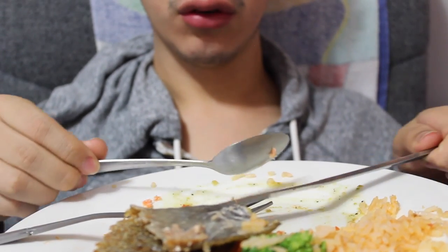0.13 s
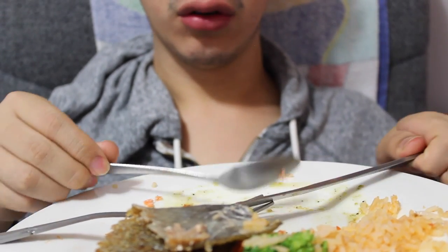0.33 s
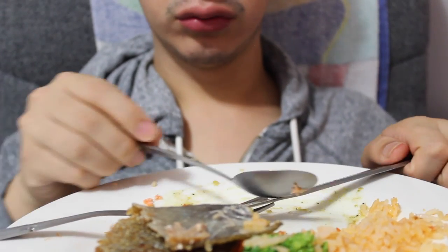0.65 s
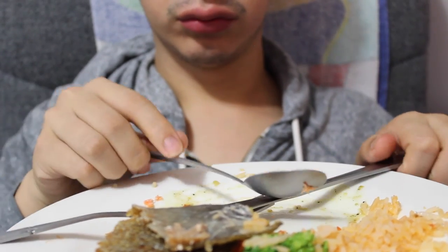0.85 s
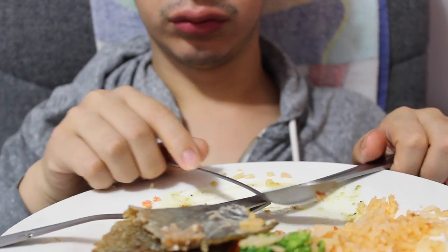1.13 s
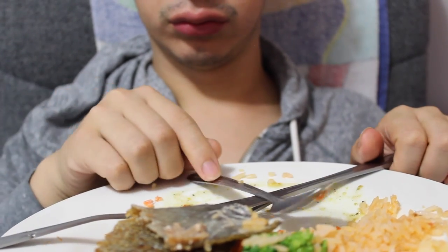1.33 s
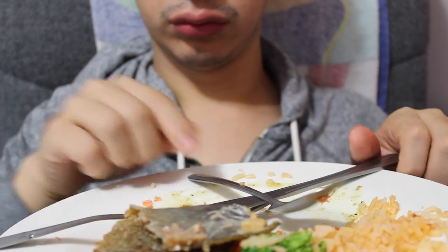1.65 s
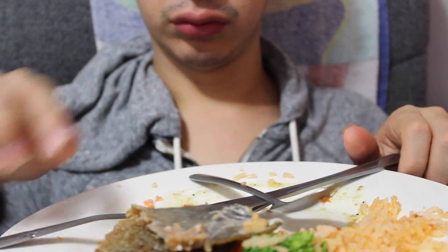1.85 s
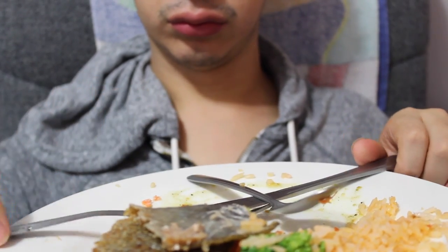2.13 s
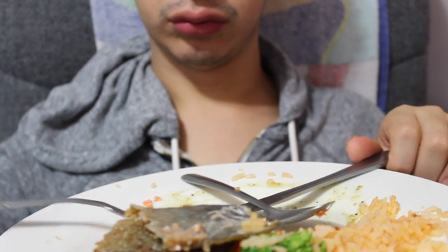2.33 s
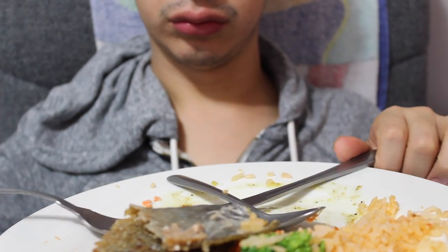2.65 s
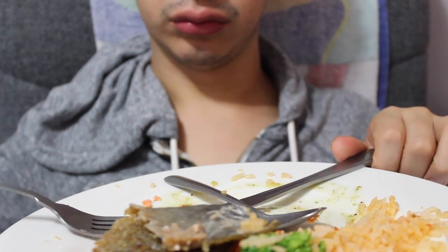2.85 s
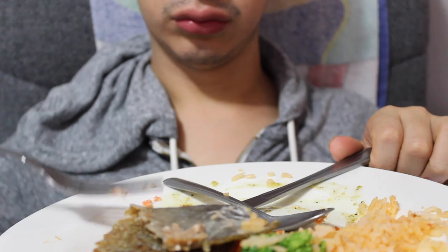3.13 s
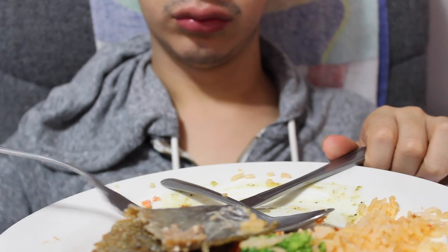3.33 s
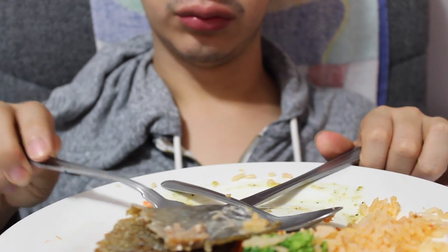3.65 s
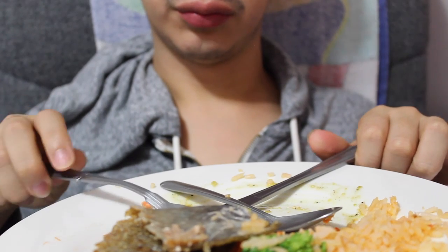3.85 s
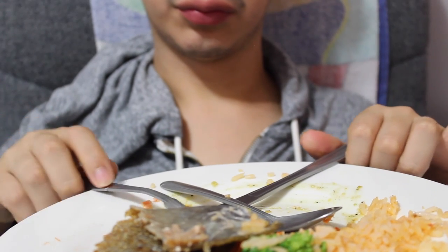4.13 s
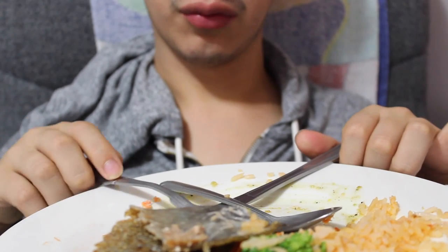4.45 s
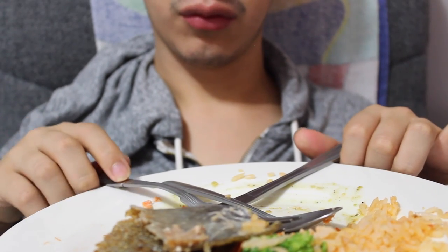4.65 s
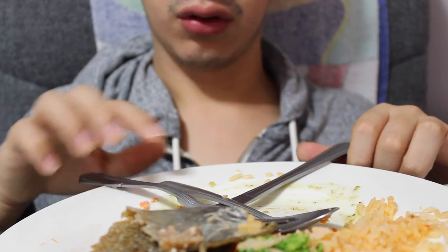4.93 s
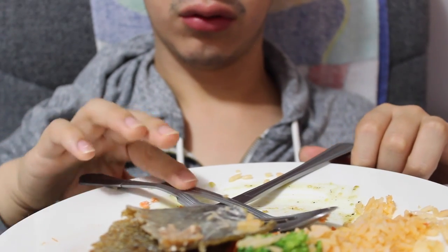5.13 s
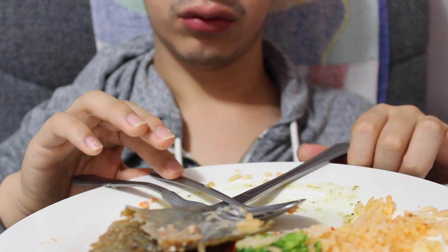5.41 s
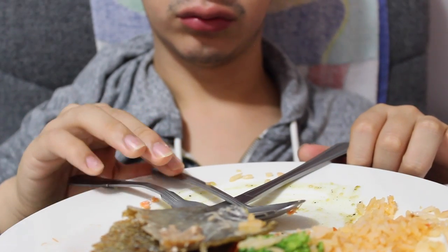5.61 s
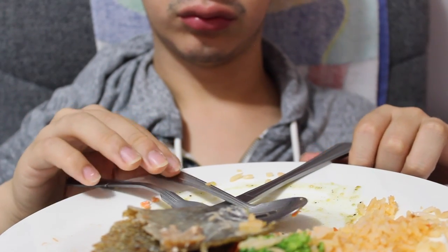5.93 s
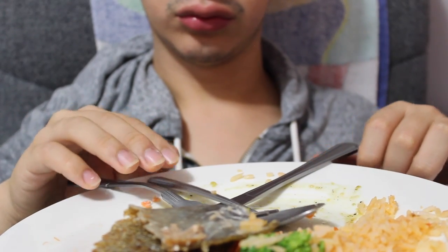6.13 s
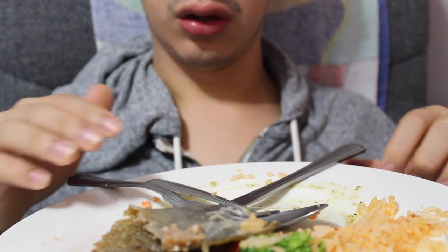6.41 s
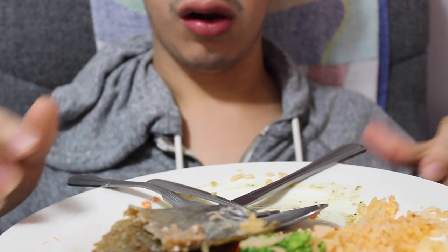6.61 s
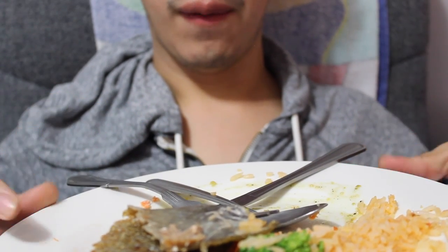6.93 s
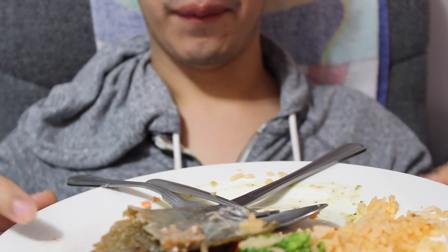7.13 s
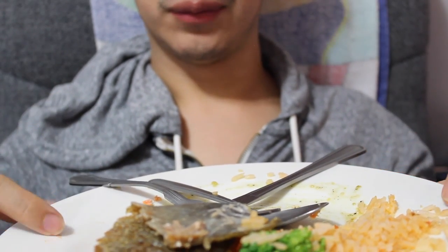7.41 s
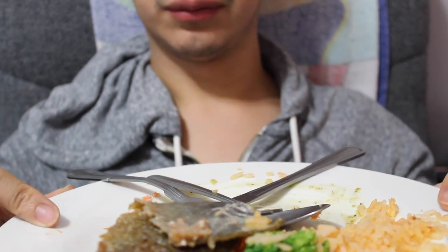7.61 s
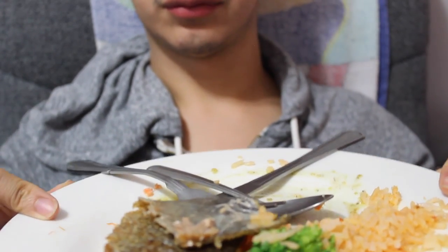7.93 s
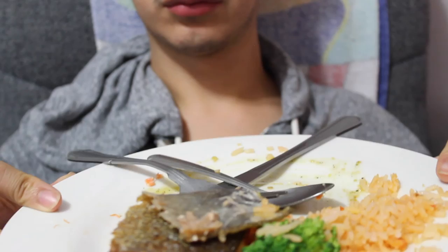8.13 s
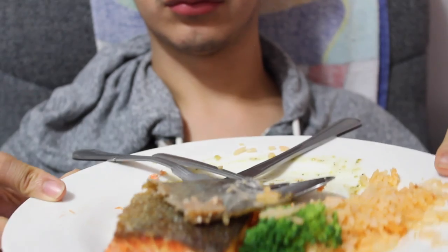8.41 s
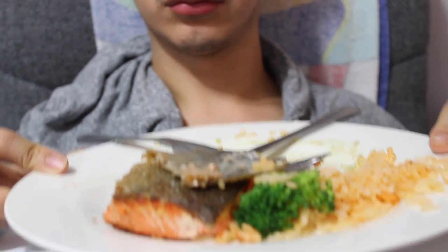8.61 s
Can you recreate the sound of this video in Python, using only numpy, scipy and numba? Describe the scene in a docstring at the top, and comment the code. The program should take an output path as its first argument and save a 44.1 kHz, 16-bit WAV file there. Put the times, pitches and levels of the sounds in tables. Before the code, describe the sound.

Metal spoon, knife and fork clink, rattle and scrape on a ceramic dinner plate close up, then soft hand bumps in a quiet room.

```python
"""Cutlery on a ceramic plate

Steel cutlery is laid, slid and dropped on a dinner plate close to a camera microphone. Each contact
is a short chatter of noisy impacts ringing damped modes of plate and steel; slides add gliding rings.
Fingers bump rim and table as softer bursts through low modes, over filtered-noise room tone and mains hum."""
import sys
import numpy as np
from scipy import signal
from scipy.fft import rfft, irfft, next_fast_len
from scipy.io import wavfile
from scipy.ndimage import uniform_filter1d
from numba import njit

SR = 44100
rng = np.random.default_rng(int(sys.argv[2]) if len(sys.argv) > 2 else 0)


def file_out(sig):
    """Save sig as 16-bit WAV at sys.argv[1]."""
    # one column per channel
    cols = np.atleast_2d(sig).T
    # limit, then scale
    lim = np.clip(cols, -1, 1)
    pcm = np.round(lim * 32767).astype(np.int16)
    wavfile.write(sys.argv[1], SR, pcm)


N = 386757

# Cutlery contacts: t/s, plate peak/dB, tines re plate/dB (capped at -4), bowl re plate/dB,
# nearest ring f/Hz, fall by 60 dB/s (capped at 0.3)
CONTACTS = [(.402, -19.5, -28, -39, 2016, 0.087), (.467, -28, -19, -20, 2460, .13),
            (.483, -14, -18.5, -22.5, 1804, .12), (0.587, -31, -39, -3.5, 2020, .085),
            (.649, -19.5, -12, -27, 3510, .15), (0.791, -45, -24, -33, 3920, 0.13),
            (0.839, -38.5, -24, -28, 3900, 0.054), (0.882, -42.5, -22, -26, 1870, 0.11),
            (.917, -41, -32, -5, 4680, 0.059), (0.968, -38.5, -24.5, -17, 1947, 0.18),
            (1.007, -38.5, -29, -36, 3796, .07), (1.045, -42.5, -33, -32, 1895, .1),
            (1.105, -49.5, -30.5, -32.5, 3480, 0.072), (1.165, -22, -43, -25, 2190, 0.34),
            (1.217, -13, -22.5, -20, 3160, 0.14), (1.249, -14, -19, -23.5, 3600, .14),
            (1.292, -13.5, -26, -27.5, 4780, 0.07), (1.356, -16, -11, -25.5, 5200, 0.29),
            (1.381, -12.5, -8.5, -32, 2810, 0.14), (1.407, -19, -5, -31, 2130, 0.039),
            (1.466, -16.5, -13, -34, 4770, .12), (1.508, -31.5, -27, -37, 2970, 0.09),
            (1.597, -33.5, -52, -33, 2720, 0.08), (2.099, -18.5, -23, -16.5, 1800, 0.12),
            (2.168, -28, -25, -30, 4520, 0.066), (2.276, -41.5, -20, -20, 4780, 0.092),
            (2.389, -15.5, -13, -26, 2800, 0.061), (2.402, -5.5, -16.5, -29.5, 1667, 0.12),
            (2.458, -16.5, -16, -32, 2130, 0.17), (2.509, -24.5, -36, -30, 2140, 0.27),
            (2.577, -24, -45, -19, 1650, 0.05), (2.602, -19.5, -19, -25, 4670, 0.17),
            (2.627, -22.5, -12, -11.5, 2100, 0.14), (2.672, -24, -19, -21, 2140, 0.12),
            (2.912, -37.5, -34, -54, 4790, 0.04), (3.009, -30, -21.5, -36, 2590, 0.067),
            (3.032, -19, -17, -41, 3430, 0.19), (3.068, -22.5, -11.5, -29, 1755, 0.11),
            (3.116, -16.5, -30, -23, 1740, 0.074), (3.194, -35.5, -30, -38, 4850, 0.039),
            (3.473, -18.5, -12, -26, 2780, 0.28), (3.524, -10, -12.5, -22, 4930, 0.084),
            (3.55, -13, -11.5, -23, 2650, 0.077), (3.568, -14, -13, -31, 3140, 0.11),
            (3.628, -28, -34, -21, 2850, 0.2), (3.706, -17.5, -12, -34, 2840, 0.093),
            (3.749, -27, -39, -25, 2870, .17), (4.047, -39.5, -36, -28, 3750, .1),
            (4.135, -32, -27.5, -27, 1703, 0.35), (4.223, -20, -10.5, -23, 4850, 0.11),
            (4.236, -20.5, -13.5, -23.5, 6120, .13), (4.321, -25.5, -43, -25.5, 2138, 0.069),
            (4.518, -48.5, -24, -30.5, 3820, 0.061), (4.596, -28.5, -36, -22, 3030, .14),
            (4.638, -30, -32, -28, 1695, 0.47), (4.693, -20, -17, -19.5, 1970, 0.058),
            (5.298, -31, -10, -32, 2890, 0.25), (5.323, -18, -19, -20, 2126, 0.39),
            (5.366, -19.5, -34, -49, 2060, .24), (5.415, -20.5, -12.5, -12, 1870, 0.067),
            (5.459, -26, -43, -20, 2450, .21), (5.512, -23.5, -26, -49, 2803, 0.12),
            (5.679, -41, -37, -44, 3465, 0.089), (5.686, -46, -37, -38, 4610, 0.03),
            (5.748, -31.5, -28, -29, 2606, 0.091), (5.893, -41, -38.5, -43, 3804, 0.04),
            (6.085, -16.5, -7.5, -23, 4370, 0.2), (6.109, -11, -14.5, -23, 4720, 0.2),
            (6.17, -24.5, -19, -29, 2780, 0.18), (6.211, -21, -11.5, -29, 2640, 0.21),
            (6.254, -21, -12, -27, 3030, 0.099), (6.291, -30, -23, -19, 2880, 0.18),
            (6.361, -32, -24, -12, 3170, 0.044), (7.225, -56, -24, -15, 3650, 0.096),
            (8.146, -52.5, -13.5, -10, 3550, 0.065), (8.134, -53, -11, -32, 5600, 0.034)]
# Steel dragged over glaze, per stroke: gliding ring width/Hz, plate re ring/dB, [(t/s, ring level/dB, f/Hz)]
SLIDES = [(251, -2.5, [(.71, -50, 1900), (.74, -49.5, 1950), (.79, -55.5, 2150), (.846, -51, 2480),
          (.89, -53, 2550), (.96, -61, 2720)]), (200, -8, [(2.22, -61, 2600), (2.27, -55, 2650),
          (2.305, -46, 2700), (2.39, -56.5, 2750)]), (297, 3, [(4.06, -61, 2780), (4.07, -47, 2760),
          (4.126, -43, 2560), (4.176, -45, 2570), (4.225, -50, 2470)])]
# Fingers and wrists on rim and table: t/s, peak/dB, skin tap re peak/dB (capped at 0),
# favoured ring f/Hz, fall by 60 dB/s (capped at 0.3)
KNOCKS = [(.873, -34, -20, 400, .068), (1.98, -42.5, -35, 316, 0.25), (2.04, -32, -39, 420, 0.35),
          (2.13, -39, -26, 388, 0.21), (2.188, -37, 3, 364, .077), (2.273, -41, -22, 237, 0.027),
          (6.299, -35.5, -20, 524, 0.029), (6.515, -47, -5.5, 600, 0.029), (6.859, -41, -24, 1006, 0.051),
          (6.874, -33.5, -27, 397, .083), (7.04, -36, -18, 890, 0.11), (7.065, -38.5, -15.5, 349, 0.052),
          (7.18, -34.5, -16.5, 880, 0.12), (7.197, -39, -7, 890, 0.13), (7.624, -33.5, -27, 322, 0.054),
          (8.141, -36, -14, 668, 0.093), (8.2, -51, -21, 398, 0.43), (8.625, -48, -21.5, 1010, .053)]

# Modes: f/Hz, width/Hz, relative level/dB before the scatter of each contact
# Low bending modes of the plate
BOWL_MODES = [(520, 10.8, -22.5), (572.4, 36.8, -10.5), (676.4, 26, 8), (790, 24, -5.5), (1015, 90, -11)]
# Plate and handles
PLATE_MODES = [(1460, 9, -16), (1460, 8.3, -23), (1758, 59, -8), (1768, 12, -5), (1723, 16, -7),
               (1902, 24, -2), (2148, 9.9, 3), (2293, 17, -22), (2635, 51, -14), (2637, 41, -0.5),
               (2870, 21, -10.5), (2968, 46, -0.5), (3089, 47, -5), (3410, 77, -14.5), (3517, 76, -0.5),
               (3910, 93, -8.5), (3870, 30.6, 5.5), (4024, 130, -2.5), (4190, 25, -14), (4336, 87, -12.5),
               (4640, 14, -8), (4754, 73, 2), (5260, 23, -28.5), (5920, 16, -6), (5630, 100, -5.5),
               (7050, 110, -18.5)]
# Tines, blade and spoon bowl
TINE_MODES = [(6570, 46, -4), (6990, 37, 0), (8270, 39, -2), (8510, 49, -9), (8920, 38, -7), (9640, 64, -9),
              (10200, 130, -12), (10900, 73, -15), (11100, 39, -11), (12200, 35, -9), (12500, 32, -14),
              (12700, 56, -9), (13600, 68, -14), (13800, 110, -8), (14200, 130, -13), (14400, 35, -10),
              (15600, 120, -15)]
# Table
TABLE_MODES = [(208, 62, 6), (319, 810, 33), (414, 920, 14.5), (590, 67, -4.5), (920, 73, -10.5),
               (1169, 740, -35)]
# Dry tap of a fingertip
SKIN_MODES = [(1670, 170, 10), (2150, 1000, 4), (3460, 1300, 5)]

# Weaker modes, redrawn for every push; the end points bound the family: f/Hz, level re family/dB
BOWL_HUMP = [(380, -17), (700, 0), (1250, 2)]
PLATE_HUMP = [(1380, -38), (1700, -25), (2700, -2), (4000, -14), (6200, -22.5)]
TINE_HUMP = [(6200, 2.5), (9000, -13), (12500, -21), (15600, -21.5)]

# Room tone spectrum: f/Hz, relative density/dB per Hz
ROOM_SPECTRUM = [(20, -43), (50, -15.5), (90, -18.5), (200, -4.5), (440, -6), (620, -6.5), (970, -9),
                 (1180, -7), (1400, -11.5), (4950, -19), (16000, -35)]
# Room tone swells and sinks: t/s, air rms level/dB
ROOM_SWELL = [(0, -72), (.4, -72), (.6, -65), (1.45, -67.5), (1.75, -64.5), (5.2, -64.5), (7.35, -64.5),
              (7.75, -70), (8.77, -71)]
# Mains hum: f/Hz, sine amplitude re air rms/dB, wavering share/1
HUM = [(65.4, -21, .2), (119.5, -8.5, 0.15), (178, -11, 0.25), (485, -12.5, 0.81)]

PLATE_TOP_DB = max(db for hz, width, db in PLATE_MODES)
MAIN_RING_HZ, MAIN_RING_DB = 3824, -2.5  # joins the nearest ring; level re that ring
CONTACT_RISE_S, LIGHT_RISE_S, KNOCK_RISE_S = .011, .005, .0029
LIGHT_DB = -33  # contacts at or below are quick ticks
SLIDE_TOP_HZ = 5530
STICK_S, STICK_DB = .006, 4  # stick-slip step and its level scatter
TOP_HZ = 15900


def contacts():
    """Each blow rings plate, tines and bowl in its own balance."""
    out = np.zeros(N)
    for s, peak_db, tine_db, bowl_db, near_hz, fall_s in CONTACTS:
        rise_s = CONTACT_RISE_S if peak_db > LIGHT_DB else LIGHT_RISE_S
        push = blow(rise_s, fall_s, rough_db=3.2)
        start_s = s - .002 - .5 * rise_s  # chatter is half built when it stands out

        # a light touch wakes little but the nearest modes
        lead_db = PLATE_TOP_DB + np.clip(-peak_db - 22, -3, 25)
        main_db = min(lead_db + MAIN_RING_DB, PLATE_TOP_DB + 6)
        lead = [(near_hz, 40, lead_db), (MAIN_RING_HZ, 40, main_db)]

        plate = family(push, PLATE_MODES, PLATE_HUMP, count=20, lead=lead)
        add(out, start_s, peak_at(plate, peak_db))
        tines = family(push, TINE_MODES, TINE_HUMP, count=20)
        add(out, start_s, peak_at(tines, peak_db + min(tine_db, -4)))
        bowl = family(push, BOWL_MODES, BOWL_HUMP, count=6)
        add(out, start_s, peak_at(bowl, peak_db + bowl_db))
    return out


def slides():
    """Stick-slip grit rings the plate, and a ring that glides as the contact point moves."""
    out = np.zeros(N)
    for width_hz, plate_db, stroke in SLIDES:
        s, level_db, glide_hz = np.transpose(stroke)
        t = np.arange(s[0], s[-1], 1 / SR)
        step = ((t - s[0]) / STICK_S).astype(int)
        stick_db = STICK_DB * rng.standard_normal(100)[step]
        push = grit(len(t), rough_db=2.5) * undb(stick_db)

        lead = [(MAIN_RING_HZ, 40, PLATE_TOP_DB + 2.5)]
        plate = family(push, PLATE_MODES, PLATE_HUMP, count=20, lead=lead)
        plate = plate / plate.std()

        # two equal poles at 0 Hz, shifted to the gliding pitch
        turn = np.exp(2j * np.pi * np.cumsum(np.interp(t, s, glide_hz)) / SR)
        pole = [1, -np.exp(-np.pi * width_hz / SR)]
        shifted = (plate + push) / turn
        glide = (signal.lfilter([1], np.convolve(pole, pole), shifted) * turn).imag

        rub = glide / glide.std() + undb(plate_db) * plate
        rub = band(rub, PLATE_HUMP[0][0], SLIDE_TOP_HZ)
        add(out, s[0], rub * undb(np.interp(t, s, level_db)))
    return out


def knocks():
    """Soft flesh pushes the table's low modes, with a dry skin tap on top."""
    out = np.zeros(N)
    lead_db = max(np.transpose(TABLE_MODES)[2]) + 5
    for s, peak_db, tap_db, hz, fall_s in KNOCKS:
        push = blow(KNOCK_RISE_S, fall_s, rough_db=3)
        table = body(push, TABLE_MODES, lead=[(hz, .15 * hz, lead_db)])
        table = band(table, max(210, .5 * hz), 1400)
        add(out, s - .002, peak_at(table, peak_db))
        tap = band(body(push, SKIN_MODES), 1300, 7000)
        add(out, s - .002, peak_at(tap, peak_db + min(tap_db, 0)))
    return out


def walls(x, t60_s=.14, wet_db=-15):
    """Small furnished room: a fading noise tail from the first reflection at 4 ms."""
    t = np.arange(int(.3 * SR)) / SR
    tail = rng.standard_normal(len(t)) * np.exp(-np.log(1000) * t / t60_s) * (t > .004)
    tail = tail / np.sqrt(np.sum(tail ** 2))  # unit energy
    return x + undb(wet_db) * signal.oaconvolve(x, tail)[:N]


def room_tone():
    """Air noise shaped in frequency, plus hum sines with narrow-band wavering."""
    hz, db = np.transpose(ROOM_SPECTRUM)
    size = next_fast_len(N)
    f = np.maximum(np.arange(size // 2 + 1) * SR / size, 1)
    gain = undb(np.interp(np.log(f), np.log(hz), db))
    air = irfft(rfft(rng.standard_normal(size)) * gain, size)[:N]

    t = np.arange(N) / SR
    tone = air / air.std()
    for line_hz, line_db, share in HUM:
        waver = ring(rng.standard_normal(N), np.array([float(line_hz)]), np.array([6.]), np.ones(1))
        line = np.sin(2 * np.pi * line_hz * t) + share * waver / waver.std()
        tone = tone + undb(line_db) * line
    return tone * undb(np.interp(t, *np.transpose(ROOM_SWELL)))


def blow(rise_s, fall_s, rough_db):
    """Dense chatter that builds up, holds briefly, then falls away ever more steeply."""
    fall_s = min(fall_s, .3)
    t = np.arange(int((rise_s + fall_s + .12) * SR)) / SR
    build = np.minimum(t / rise_s, 1) ** 1.5
    fade = np.exp(-np.log(1000) * (np.maximum(t - rise_s, 0) / fall_s) ** 1.7)
    return build * fade * grit(len(t), rough_db)


def grit(count, rough_db):
    """Tiny impacts: noise whose samples now and then stand far out."""
    return rng.standard_normal(count) * undb(rough_db * rng.exponential(size=count))


def family(push, modes, hump, count, lead=()):
    """Main modes plus weaker ones at random pitches, band-limited to the family's range."""
    hz, db = np.transpose(hump)
    minor_hz = rng.uniform(hz[0], hz[-1], size=count)
    minor_db = np.interp(minor_hz, hz, db)
    minor = [(f, 30, level_db) for f, level_db in zip(minor_hz, minor_db)]
    return band(body(push, list(modes) + minor, lead), hz[0], hz[-1])


def body(push, modes, lead=()):
    """The push rings the modes; where it lands scatters their strengths and picks the leads."""
    hz, width_hz, db = np.transpose(list(modes) + list(lead)).astype(float)
    db[:len(modes)] += 5 * rng.standard_normal(len(modes))  # leads stay unscattered
    return ring(push, hz, width_hz, undb(db))


@njit
def ring(x, hz, width_hz, gain):
    """Parallel damped modes: one complex pole each, levelled at its centre by its gain."""
    y = np.zeros(len(x))
    for m in range(len(hz)):
        r = np.exp(-np.pi * width_hz[m] / SR)
        pole = r * np.exp(2j * np.pi * hz[m] / SR)
        z = 0j
        for i in range(len(x)):
            z = z * pole + x[i] + 1e-18  # offset avoids denormals
            y[i] += gain[m] * (1 - r) * z.imag
    return y


def band(x, lo_hz, hi_hz):
    """Steep band-pass."""
    sos = signal.butter(4, [lo_hz, hi_hz], "band", fs=SR, output="sos")
    return signal.sosfilt(sos, x)


def peak_at(x, db):
    """Scales to a peak level, taken as 2.5 times the rms of the loudest 6 ms."""
    loudest_rms = np.sqrt(uniform_filter1d(x ** 2, size=256).max())
    return x * undb(db) / (2.5 * loudest_rms)


def add(out, s, x):
    """Mixes x into out from s seconds on."""
    i = int(s * SR)
    out[i:i + len(x)] += x[:N - i]


def undb(db):
    """Decibels to amplitude gain."""
    return 10 ** (np.asarray(db) / 20)


def scene():
    """Plate, steel and table in the room, over the room tone."""
    struck = contacts() + slides() + knocks()
    return (walls(struck) + room_tone())[None]


def record(dry):
    """The camera cuts the top: steep elliptic low-pass."""
    sos = signal.ellip(10, .2, 60, TOP_HZ, fs=SR, output="sos")
    return signal.sosfilt(sos, dry)


dry = scene()
out = record(dry)
file_out(out)
```